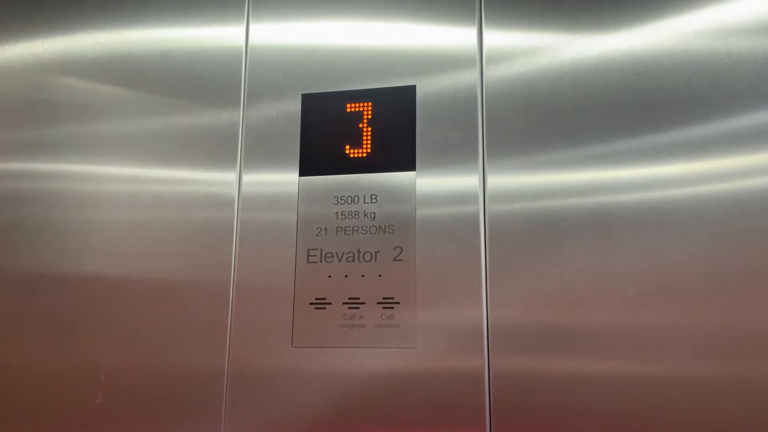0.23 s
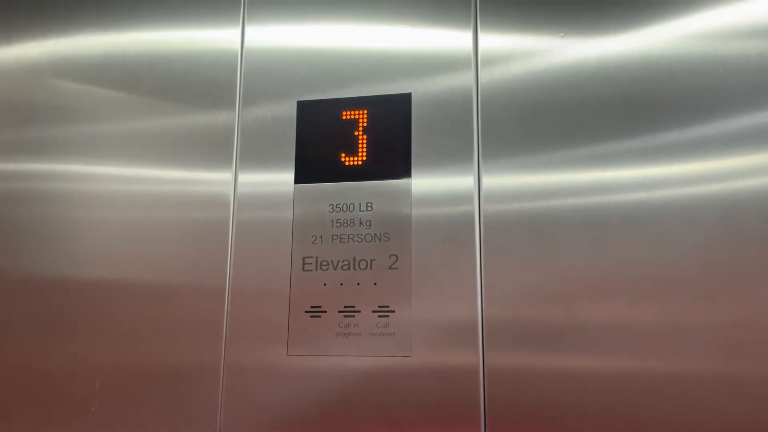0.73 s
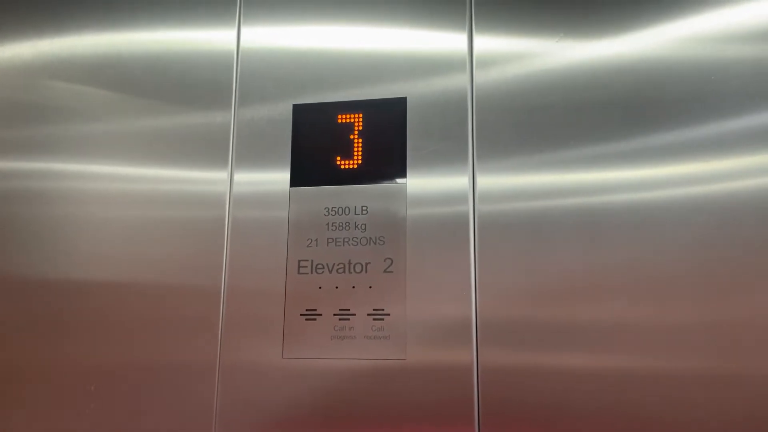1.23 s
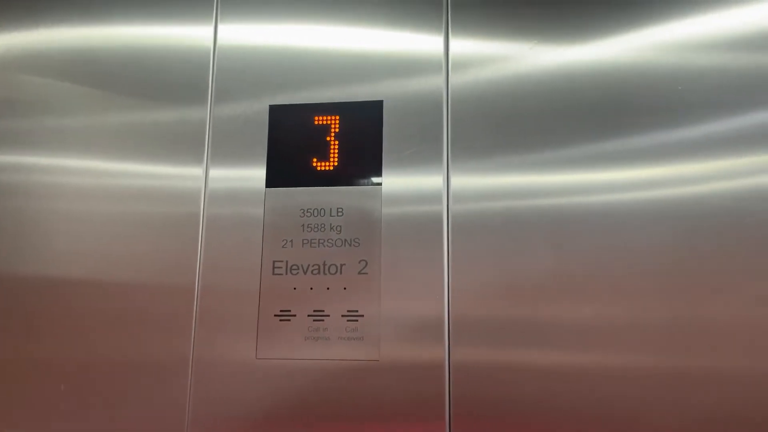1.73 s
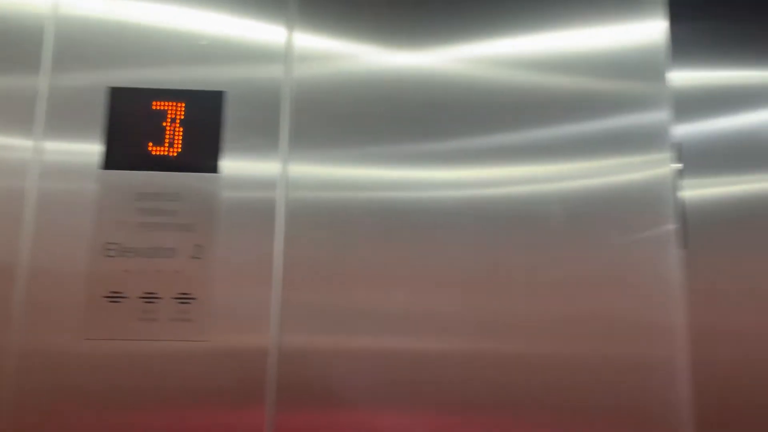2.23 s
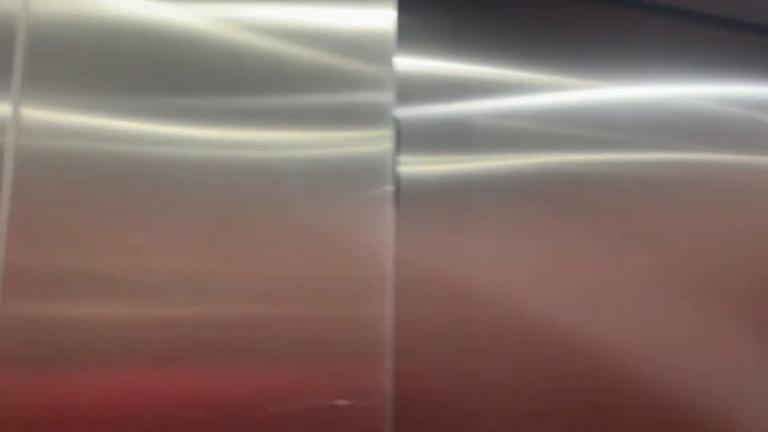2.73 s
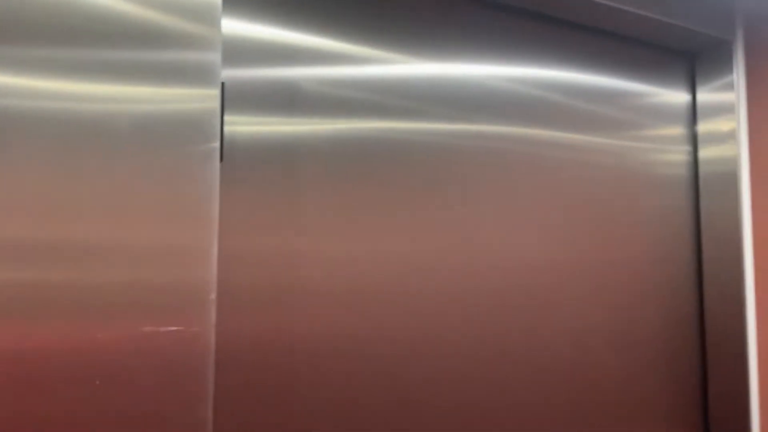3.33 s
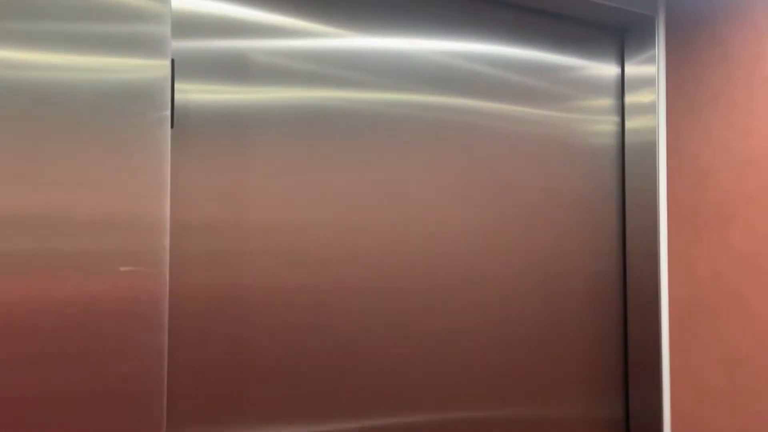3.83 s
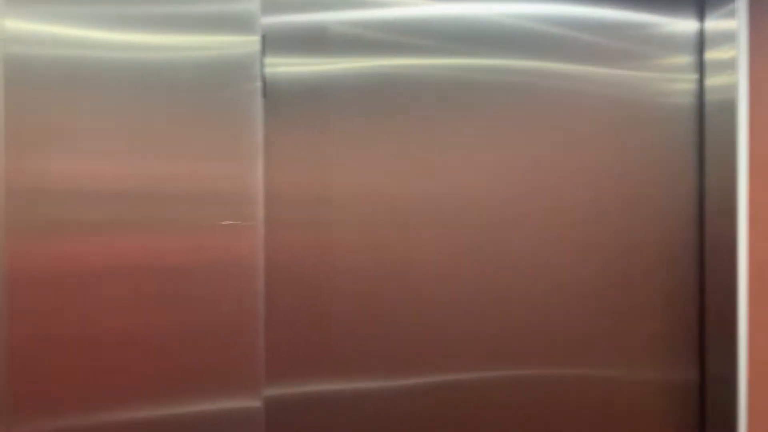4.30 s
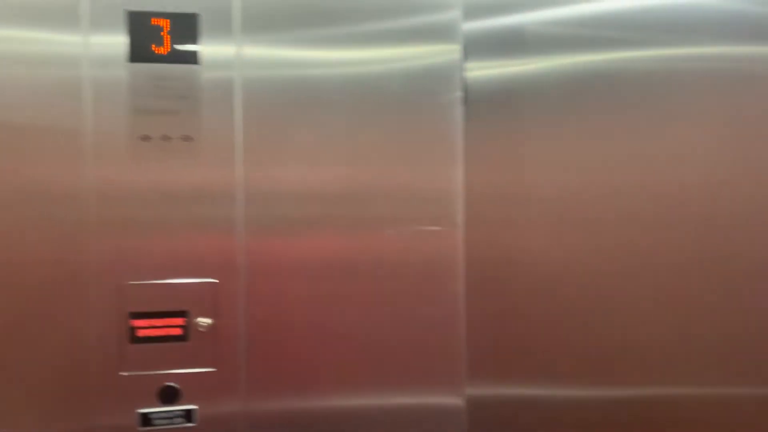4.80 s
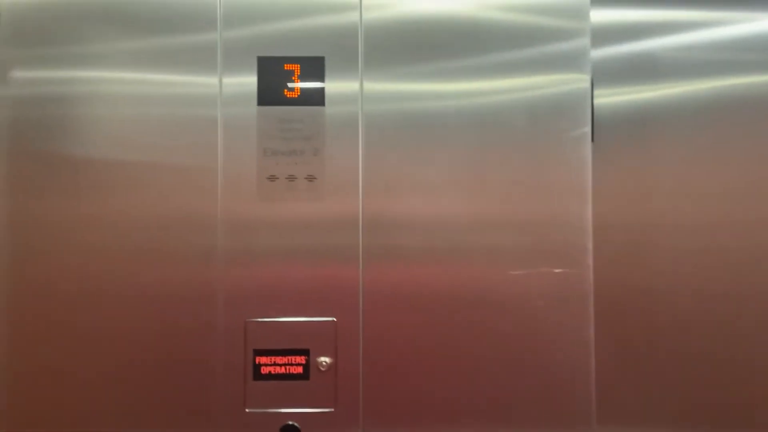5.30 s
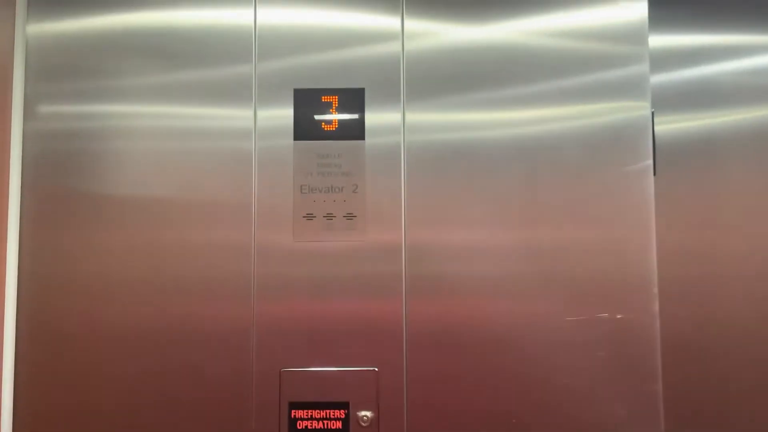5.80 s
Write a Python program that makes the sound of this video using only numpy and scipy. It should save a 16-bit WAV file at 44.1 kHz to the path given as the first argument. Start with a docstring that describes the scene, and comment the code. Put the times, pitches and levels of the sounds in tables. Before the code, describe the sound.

A droning ventilation hum and rushing air fill a moving elevator cabin, with faint fluttering whistles, soft handling ticks and a single metal clack.

```python
"""A fan hum with thin whistles over a low rumble: the inside of a small steel elevator car during its ride.
The hum is a harmonic stack on the blade tone, the whistles are wavering tones with flares, and the rumble,
duct rush and hiss are coloured noise. The microphone turns away from the panel through standing waves.
A latch clacks once, as noise decaying at the cabin's rates and a damped panel knock; faint scuffs (noise
bands), hollow taps (decaying sines) and crisp ticks (noise bursts) sound close by."""
import sys
import numpy as np
from scipy import signal
from scipy.fft import rfft, irfft, next_fast_len
from scipy.io import wavfile
from scipy.ndimage import uniform_filter1d, map_coordinates

SR = 44100
rng = np.random.default_rng(int(sys.argv[2]) if len(sys.argv) > 2 else 0)


def master_out(mix):
    """Clip the mix to full scale and print it as 16-bit PCM to the path in sys.argv[1]."""
    frames = np.transpose(np.atleast_2d(mix))
    ceiling = np.clip(frames, -1, 1)
    pcm = np.round(ceiling * 32767).astype(np.int16)
    wavfile.write(sys.argv[1], SR, pcm)


N = 266849
T = np.arange(N) / SR  # time [s]

# The microphone's turn: (time [s], share turned away from the panel [0-1], blade tone left over right [dB])
TURN = [(0, 0.28, -4), (1.8, 0.1, -1.5), (2.6, 0.54, -2), (3.9, 0.93, 2), (4.7, 0.84, -1), (6.05, 0.92, -6)]
# The microphone is held almost still, then moves: (time [s], share of the full drift [0-1])
RESTLESS = [(1.9, .15), (2.4, 1)]
# Contacts of the latch: (time [s], level [dB])
LATCH = [(2.843, -35), (2.8477, -29.5)]


def amp(db):
    """Level to amplitude: 20 dB is a factor of ten."""
    return 10 ** (np.asarray(db) / 20)


def unit(x):
    """Normalisation to a root-mean-square of 1."""
    return x / np.sqrt(np.mean(x ** 2) + 1e-20)


def along(points, hz):
    """Linear interpolation of (frequency, value) points on a logarithmic frequency axis."""
    f, v = np.transpose(points)
    return np.interp(np.log(hz + 1), np.log(f + 1), v)


def curves(rows):
    """Linear interpolation in time: one curve for each column after the time."""
    s, *cols = np.transpose(rows)
    return [np.interp(T, s, c) for c in cols]


def wobble(rate):
    """Slow random modulation: a smooth curve through random knots, rate of them a second."""
    coarse = T[::64]
    knots = rng.standard_normal(1024)
    return np.interp(T, coarse, map_coordinates(knots, [coarse * rate], mode="mirror"))


def filtered(x, response):
    """Linear filtering: the spectrum is multiplied by a response of frequency."""
    m = next_fast_len(N + SR // 2)
    return irfft(rfft(x, m) * response(np.fft.rfftfreq(m, 1 / SR)), m)[..., :N]


def peaks_db(modes, hz):
    """Resonance peaks: the total lift in dB of a set of modes at each frequency."""
    return sum(db / (1 + (2 * (hz - centre) / width) ** 2) for centre, width, db in modes)


def pan(db):
    """Level-difference stereo: left and right gains whose ratio is db."""
    return amp(np.array([[.5], [-.5]]) * db)


def turned():
    """Directional exposure: how far the microphone has turned away from the panel, 0-1."""
    return np.clip(curves(TURN)[0], 0, 1)


def rush(colour_db):
    """Turbulent noise of rms 1; the mid-side balance sets the left-right coherence by frequency."""
    # Coherence of the two channels: (frequency [Hz], left-right likeness, clipped to -1..1)
    likeness = [(60, 1), (250, 0.8), (400, 0.71), (600, -0.16), (1000, -0.34), (2000, -0.0025),
                (4000, 0.75), (7500, -1.1)]

    def mid_side_response(hz):
        angle = np.arccos(np.clip(along(likeness, hz), -1, 1)) / 2
        return amp(colour_db(hz)) * [np.cos(angle), np.sin(angle)]

    mid, side = filtered(rng.standard_normal((2, N)), mid_side_response)
    return unit(np.array([mid + side, mid - side]))


def steadied(x, seconds):
    """Power normalisation: the slow chance swells of noise are evened out."""
    power = uniform_filter1d(np.mean(x ** 2, axis=0), max(int(seconds * SR), 1))
    return x / np.sqrt(np.abs(power) + 1e-6)


def patchy(x, depth_db):
    """Time-frequency modulation: soft patches of random gain in the noise."""
    z = signal.stft(x, nperseg=1024)[2]
    field = uniform_filter1d(rng.standard_normal(z.shape[1:]), size=4, axis=0)
    field = uniform_filter1d(field, size=14, axis=1)
    return signal.istft(z * amp(depth_db * unit(field)), nperseg=1024)[1][:, :N]


def resonance(centre_hz, width_hz):
    """A driven resonator: noise in one narrow band (6 dB down at its edges), steadied to rms 1."""
    ring = rush(lambda hz: -20 * np.log10(1 + (2 * (hz - centre_hz) / width_hz) ** 2))
    return steadied(ring, seconds=0.12)


def tone(phase, spread, fade_db, rate):
    """Standing-wave drift: a tone of rms 1 whose level and phase [rad] wander separately at each port."""
    restless = curves(RESTLESS)[0]
    ports = []
    for _ in range(2):
        level = amp(fade_db * restless * wobble(rate))
        ports.append(level * np.sin(phase + spread * restless * wobble(rate)))
    return unit(np.array(ports))


def fan_hum():
    """Blade passing makes a harmonic stack; each overtone swells and fades through standing waves."""
    # Levels of the blade tone and its strongest overtones at the microphone: (time [s], level [dB])
    first = [(0.06, -37.5), (1.68, -37.5), (2.2, -34), (2.55, -32.5), (2.92, -29), (2.97, -34.5),
             (3.07, -29), (4.23, -30), (4.29, -33), (5.4, -32.5), (6.0, -35.5)]
    second = [(0.0, -41.5), (0.2, -39.5), (0.32, -52), (0.45, -41.5), (.75, -41.5), (.86, -44), (1.2, -39),
              (1.4, -46), (1.9, -43), (2.1, -48.5), (3.25, -50.5), (3.5, -42.5), (3.62, -47.5), (3.95, -43),
              (4.4, -45), (4.85, -54.5), (5.2, -47.5), (6.0, -50)]
    third = [(0, -56.5), (2.15, -67.5), (2.4, -50), (2.95, -52), (3.2, -61), (3.35, -52.5), (3.8, -54),
             (4.05, -50), (4.38, -60), (4.7, -51), (5.25, -52.5), (5.7, -61.5)]
    fourth = [(0, -65.5), (1.5, -61), (4.2, -68), (4.5, -81), (4.8, -74), (5.0, -57.5), (5.3, -53),
              (5.8, -49), (6.05, -57.5)]
    fifth = [(0, -76), (2.1, -73.5), (2.45, -68.5), (3.4, -68.5), (3.95, -74.5), (4.2, -66.5), (4.45, -71),
             (4.6, -65.5), (4.85, -78.5), (5.2, -71.5), (5.4, -62.5), (5.65, -60), (6.05, -76)]
    sixth = [(0, -61), (1.7, -58.5), (2.2, -66), (2.9, -62), (3.1, -73), (3.5, -59.5), (3.9, -74.5),
             (4.25, -64), (4.6, -70), (5.0, -64), (5.45, -61.5), (6.05, -67)]
    twelfth = [(0, -61.5), (1.9, -64.5), (2.2, -71), (2.6, -68.5), (2.95, -57.5), (3.3, -64.5),
               (3.45, -64.5), (3.7, -78), (4.1, -68), (4.5, -70.5), (4.8, -63), (5.3, -75), (6.05, -67.5)]
    # Upper overtones: (multiple, level at the panel [dB], by the door [dB], further back [dB])
    buzz = [(7, -89, -77.5, -73.5), (8, -70, -66.5, -68.5), (9, -71.5, -69, -74), (10, -78, -80, -74),
            (11, -78.5, -74, -66.5), (13, -78, -74.5, -77), (14, -63.5, -66, -72.5),
            (15, -86.5, -82.5, -70.5), (16, -71, -75.5, -74.5), (17, -67, -70, -71),
            (18, -73.5, -79, -65.5), (19, -79.5, -78, -80), (20, -81, -77, -73.5), (21, -73.5, -76, -73.5),
            (22, -79.5, -77, -81)]
    # Share of the turn at those three places: [0-1]
    places = (.15, .55, .97)
    blade_hz, buzz_pan_db = 252.12, -5
    # Standing waves: rate of crossing [knots/s], depth of the dips and lift at the crests [dB]
    crossing_rate, dip_db, antinode_db = 3.5, 7, 3.3

    away = turned()
    restless = curves(RESTLESS)[0]
    phase = 2 * np.pi * blade_hz * T
    blade = tone(phase, spread=0.056, fade_db=0.0, rate=5.2)
    out = amp(curves(first)[0]) * pan(curves(TURN)[1]) * blade
    out += amp(curves(second)[0]) * tone(2 * phase, spread=0.43, fade_db=-1.5, rate=4)
    for k, rows in [(3, third), (4, fourth), (5, fifth), (6, sixth), (12, twelfth)]:
        out += amp(curves(rows)[0]) * tone(k * phase, spread=0.6, fade_db=1.45, rate=1.654)
    for k, *place_db in buzz:
        crossing = amp(restless * (antinode_db - dip_db * np.abs(wobble(crossing_rate))))
        start = rng.uniform(0, 2 * np.pi)
        overtone = tone(k * phase + start, spread=0.93, fade_db=4.0, rate=2.55)
        out += amp(np.interp(away, places, place_db)) * crossing * pan(buzz_pan_db) * overtone
    return out


def thin_tone(pitch_hz, jitter_hz, base_db, swells):
    """Frequency and amplitude modulation: a wavering tone whose flares add power to its steady level."""
    flutter_db = 1.7
    flare_edge = 4  # 2 is rounded, higher cuts in and out more abruptly
    phase = 2 * np.pi * np.cumsum(pitch_hz + jitter_hz * wobble(60)) / SR
    power = amp(base_db) ** 2
    for s, length, db in swells:
        offset = np.minimum(np.abs(2 * (T - s) / length), 2)
        power = power + amp(db) ** 2 * np.exp(-offset ** flare_edge)
    carrier = tone(phase, spread=0.66, fade_db=-0.5, rate=7.6)
    return np.sqrt(power) * amp(flutter_db * wobble(45)) * carrier


def whistles():
    """Flow tones: one draught bends both; the upper beats against the fan overtone it glides past."""
    # The upper whistle rises and sinks with the draught: (time [s], pitch [Hz])
    whistle_pitch = [(0, 4275), (1.2, 4327), (1.85, 4276), (2.4, 4268), (3.05, 4320), (3.85, 4246),
                     (4.3, 4253)]
    # Steady levels, lower after the turn: (time [s], lower whistle [dB], upper whistle [dB])
    whistle_level = [(0, -59, -74), (.72, -61, -72), (.83, -72, -64), (1.42, -64, -63), (1.5, -71, -74),
                     (2.0, -66.5, -71), (2.6, -63.5, -69), (3.4, -63.5, -67), (3.8, -64.5, -70),
                     (4.05, -70, -79.5), (6.05, -77.5, -87)]
    # Flares of the lower and of the upper whistle: (centre time [s], length [s], level [dB])
    low_swells = [(0.056, 0.17, -50), (0.263, 0.08, -54.5), (.36, 0.074, -51.5), (0.557, 0.12, -51.5),
                  (0.715, 0.12, -58), (0.925, 0.1, -54), (1.092, 0.11, -54.5), (1.27, 0.13, -48.5),
                  (1.431, 0.079, -51), (1.527, 0.03, -59), (1.645, 0.11, -48.5), (1.845, .12, -55),
                  (1.995, 0.048, -54.5), (2.115, 0.12, -53.5), (2.28, .12, -52.5), (2.394, 0.06, -54.5),
                  (2.468, 0.045, -52.5), (2.733, 0.12, -54), (2.916, .06, -55), (3.03, 0.043, -53),
                  (3.149, 0.05, -51.5), (3.222, 0.051, -53.5), (3.54, .07, -60.5), (3.78, 0.089, -60),
                  (3.89, 0.14, -61)]
    high_swells = [(.075, .07, -64), (.165, 0.045, -64), (.27, 0.067, -71), (0.348, 0.045, -63),
                   (.45, .06, -63), (0.537, .045, -61), (.61, 0.035, -62), (0.69, 0.055, -64),
                   (.77, .035, -61), (1.507, 0.037, -59.5), (1.65, 0.037, -58.5), (1.77, .11, -63),
                   (1.922, 0.072, -57), (2.065, .09, -60.5), (2.19, .04, -67), (2.26, .035, -60),
                   (2.385, .045, -60), (2.774, .07, -62), (2.98, 0.049, -58), (3.09, 0.05, -60.5),
                   (3.135, 0.026, -58), (3.43, .08, -55.5), (3.53, 0.04, -64.5), (3.622, 0.037, -59.5),
                   (3.72, .09, -64.5), (4.12, .071, -67.5), (4.2, 0.036, -68), (4.343, 0.08, -65),
                   (4.42, 0.093, -65)]
    low_rest_hz, high_rest_hz = 1953, 4287
    low_follows = .55  # exponent: share of the bend, in musical pitch, that the lower whistle follows

    high_hz = curves(whistle_pitch)[0]
    low_hz = low_rest_hz * (high_hz / high_rest_hz) ** low_follows
    low_db, high_db = curves(whistle_level)
    low = pan(db=4.5) * thin_tone(low_hz, 3, low_db, low_swells)
    high = pan(db=-4.5) * thin_tone(high_hz, 4, high_db, high_swells)
    return low + high


def ride():
    """Forced vibration: the car sways on its lowest mode, a low boom swells and the guides rumble."""
    # Levels of the sway, and random swells of a low boom near 83 Hz: (time [s], level [dB])
    sway_level = [(0.0, -58), (0.25, -47), (2.26, -53.5), (2.59, -41.5), (3.29, -44), (3.37, -35.5),
                  (3.96, -48.5), (4.14, -35.5), (4.48, -36), (4.64, -39.5), (5.21, -36), (5.35, -64),
                  (5.68, -35), (5.78, -52), (5.83, -45), (6.0, -42)]
    boom_level = [(0.04, -34), (0.37, -45.5), (0.65, -37.5), (0.72, -49), (0.85, -36), (0.93, -47.5),
                  (1.76, -42.5), (1.77, -37), (3.75, -38.5), (4.07, -46), (4.5, -39), (5.97, -42)]
    # Colour of the guides' rumble: (frequency [Hz], relative spectral level [dB])
    roll_colour = [(20, -23), (36, -7.5), (50, -11.5), (59, 6), (70, -13), (100, 1.5), (117, 4.5),
                   (130, -4.5), (148, 0), (175, -9), (400, -79)]
    roll_base_db, roll_swing_db = -42, 1.4
    jolt_db, jolt_s = 7, 0.42  # the rumble starts louder, then settles

    sway = amp(curves(sway_level)[0]) * resonance(centre_hz=46.9, width_hz=1.9)
    boom_db = curves(boom_level)[0] + 2.4 * wobble(8.3)
    boom = amp(boom_db) * resonance(centre_hz=83.5, width_hz=27)
    roll_db = roll_base_db + roll_swing_db * wobble(2.5) + jolt_db * np.exp(-(T / jolt_s) ** 2)
    roll = amp(roll_db) * steadied(rush(lambda hz: along(roll_colour, hz)), seconds=0.15)
    return (sway + boom + roll) * pan(db=1.5)


def cabin_rings():
    """Room resonance: a few narrow cabin modes drone softly and swell now and then."""
    # Narrow modes: (frequency [Hz], width [Hz], level [dB])
    ring_modes = [(189.7, 8.6, -58), (386, 14, -51.5), (503.3, 53, -50), (1069, 17, -70.5)]
    # Swells, one list for each mode: (centre time [s], length [s], rise [dB])
    ring_swells = [
        [(3.07, 0.093, 17.5), (3.5, 0.53, 13.5)],
        [(1.08, 0.16, 8.5), (2.9, 0.26, 15), (2.903, 0.018, 1), (5.37, 0.13, 12.5)],
        [(3.5, 0.14, 14), (5.85, 0.21, 7)],
        [(5.057, 0.44, 17)],
    ]
    out = np.zeros((2, N))
    for (hz, width, db), swells in zip(ring_modes, ring_swells):
        swell_db = sum(rise * np.exp(-((T - s) / length) ** 2) for s, length, rise in swells)
        out += amp(db + swell_db) * resonance(centre_hz=hz, width_hz=width)
    return out


def air():
    """Turbulent flow: fan air rushes in the duct, exciting cabin modes, and hisses at the grille."""
    # Colours of the duct rush and of the grille hiss: (frequency [Hz], relative spectral level [dB])
    duct_colour = [(100, -27), (180, -3.5), (240, 6.5), (310, -3.5), (400, -5.5), (480, -3.5), (600, -2),
                   (700, -5), (850, -16.5), (1030, -11.5), (1250, -25.5), (2000, -31), (5000, -76.5)]
    hiss_colour = [(500, -17), (1200, 1), (1900, -0.5), (2600, -4.5), (3500, -6), (4700, -9.5), (5600, -13),
                   (6800, -12.5), (8200, -45), (9500, -21), (11600, -23), (13200, -35.5), (14200, -64.5)]
    # Cabin modes, then the change of colour when turned away: (frequency [Hz], width [Hz], lift [dB])
    cabin_modes = [(182, 2.8, -1.5), (239, 30, -3.5), (268.8, 14, 8.5), (354.3, 41, 10), (374.4, 9.9, -7.5),
                   (423.3, 19, 5.5), (447.8, 43, 9), (467.3, 15, 5.5), (471.6, 2, 8.5), (482, 18, -8.5),
                   (538.5, 46, 6), (594, 20, -1.5), (625.6, 3.2, 9.5), (743, 17, 3.5), (890, 6.9, 2),
                   (980, 82, -2), (1044, 29, 7.5)]
    turned_colour = [(243, 160, 5.5), (417, 170, -8)]
    duct_base_db, duct_swing_db = -37.5, 0.84
    hiss_base_db, hiss_turned_db, hiss_patch_db = -56.5, 1, 2
    fade_db_per_s, fade_from_s = -1.22, 2  # the hiss slowly recedes

    away = turned()
    duct_noise = rush(lambda hz: along(duct_colour, hz) + peaks_db(cabin_modes, hz))
    facing = steadied(duct_noise, seconds=0.11)
    averted = filtered(facing, lambda hz: amp(peaks_db(turned_colour, hz)))
    duct = (1 - away) * facing + away * averted
    hiss = patchy(rush(lambda hz: along(hiss_colour, hz)), hiss_patch_db)
    hiss_db = hiss_base_db + hiss_turned_db * away + fade_db_per_s * np.maximum(T - fade_from_s, 0)
    duct_db = duct_base_db + duct_swing_db * wobble(8)
    return amp(duct_db) * duct + amp(hiss_db + 0.82 * wobble(12.0)) * hiss


def scuffs():
    """Friction noise: hand rubs on the case, each a broad band that rises fast and fades."""
    # (start [s], level [dB], decay time constant [s], centre [Hz], half width at -3 dB [Hz])
    rubs = [(0.282, -70, 0.045, 10500, 1700), (2.951, -66.5, 0.046, 10900, 1680),
            (3.296, -53, 0.073, 1810, 2400), (4.206, -47, 0.04, 1290, 1690),
            (4.284, -50.5, 0.045, 2000, 3020)]
    out = np.zeros((2, N))
    for s, db, length, centre_hz, width_hz in rubs:
        age = np.maximum(T - s, 0)
        stroke = (1 - np.exp(-age / (0.12 * length))) * np.exp(-age / length)
        out += amp(db) * stroke * rush(lambda hz: -3 * ((hz - centre_hz) / width_hz) ** 2)
    return out


def taps():
    """Damped free vibration: light contacts each ring one short, hollow note."""
    # (start [s], level before attack and decay [dB], frequency [Hz], 60 dB decay time [s])
    contacts = [(.444, -39, 846, 0.063), (4.836, -45, 865, .08), (5.247, -31, 816, 0.049),
                (5.256, -38, 885, 0.033)]
    out = np.zeros(N)
    for s, db, hz, t60 in contacts:
        age = np.maximum(T - s, 0)
        attack = 1 - np.exp(-age / 0.0049)
        out += amp(db - 60 * age / t60) * attack * np.sin(2 * np.pi * hz * age)
    return out


def clicks():
    """Impulsive excitation: the case ticks in the hand, a bright snap with a longer cabin answer."""
    # Crisp ticks: (time [s], level [dB])
    ticks = [(2.745, -60), (2.75, -63.5), (2.824, -64.5), (4.282, -58), (4.289, -60), (4.297, -59)]
    # Colour of a tick: (frequency [Hz], relative spectral level [dB])
    click_colour = [(3000, -10.5), (6500, 1), (8200, -12), (9500, 3), (12000, -2), (14000, -15),
                    (15500, -9.5)]
    snap_s, answer_db, answer_s = 0.0054, -3, .028  # _s: decay time constants [s]
    out = np.zeros((2, N))
    for s, db in ticks:
        age = np.maximum(T - s, 0)
        decay = np.exp(-age / snap_s) + amp(answer_db) * np.exp(-age / answer_s)
        out += amp(db) * (T >= s) * decay * rush(lambda hz: along(click_colour, hz))
    return out


def latch():
    """Reverberant decay: contacts ring the door's metal and dense reflections; low ones last longest."""
    # Colour of the clack: (frequency [Hz], relative spectral level [dB])
    clack_colour = [(100, -37), (200, 6), (350, 4), (600, 9), (900, -1), (1280, -6), (1600, 1), (2100, -5),
                    (3200, -13.5), (4500, -19.5), (6800, -26.5), (8500, -55.5), (12000, -53)]
    # Modes of the metal: (frequency [Hz], width [Hz], lift [dB])
    metal_modes = [(731, 48, 11.5), (970, 80, 6.5), (1127, 130, 13.5), (1437, 50, 4), (2300, 230, 5),
                   (3150, 90, 1.5)]
    # Decay in the cabin: (frequency [Hz], 60 dB decay time [s])
    cabin_decay = [(150, 10), (400, 0.99), (1000, 0.65), (2500, 0.39), (6000, 0.53), (12000, .1)]
    age = T[:SR]
    # the direct sound leads the reflections
    strike = (1 + 0.45 * np.exp(-age / 0.0086)) * (1 - np.exp(-age / 0.00035))
    out = np.zeros((2, N))
    for s, db in LATCH:
        metal = rush(lambda hz: along(clack_colour, hz) + peaks_db(metal_modes, hz))
        hz, t, z = signal.stft(metal[:, :SR], SR, nperseg=256)
        decay = amp(-60 * t / along(cabin_decay, hz)[:, None])
        ring = signal.istft(z * decay, SR, nperseg=256)[1][:, :SR]
        out[:, round(s * SR):][:, :SR] += amp(db) * strike * ring
    return out


def knock():
    """Modal damping: the latch's last blow knocks the door panel, whose notes die almost at once."""
    # Panel modes: (frequency [Hz], level before attack and decay [dB], 60 dB decay time [s])
    panel_modes = [(750, -26, 0.017), (995, -23, 0.037), (1490, -28, 0.02), (2170, -37, 0.021)]
    age = np.maximum(T - LATCH[-1][0], 0)
    notes = sum(amp(db - 60 * age / t60) * np.sin(2 * np.pi * hz * age) for hz, db, t60 in panel_modes)
    return notes * (1 - np.exp(-age / 0.0016))


def scene():
    """Superposition: fan, ride and small noises add in the cabin."""
    steady = fan_hum() + whistles() + ride() + cabin_rings() + air()
    return steady + scuffs() + taps() + clicks() + latch() + knock()


def record(dry):
    """Time difference and band limit: the left port hears one sample later than the right."""
    top_hz = 15700
    lag = np.array([[.5], [-.5]]) / SR
    edges = np.clip(np.minimum(T, T[-1] - T) / .004, 0, 1)  # 4 ms fades at both ends
    return filtered(dry * edges, lambda hz: (hz < top_hz) * np.exp(-2j * np.pi * hz * lag))


dry = scene()
out = record(dry)
master_out(out)
```